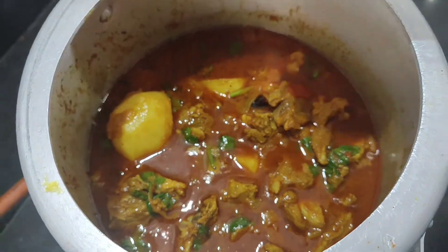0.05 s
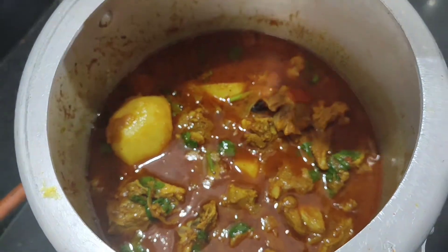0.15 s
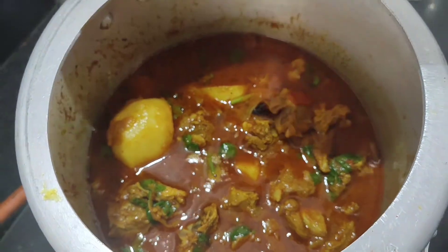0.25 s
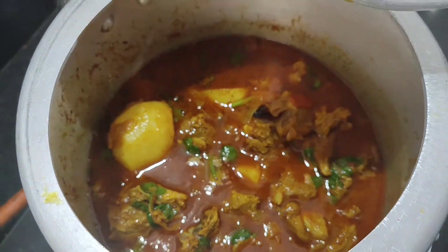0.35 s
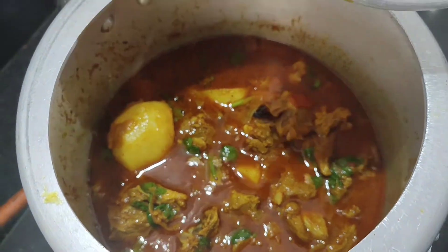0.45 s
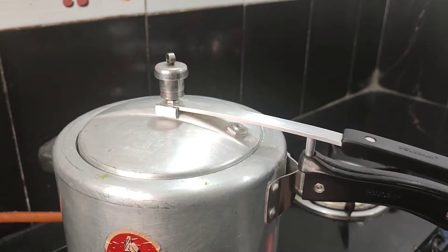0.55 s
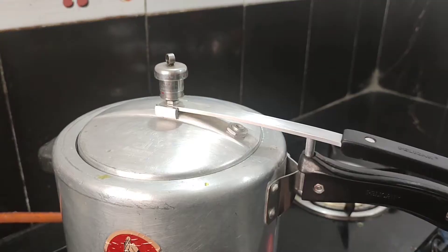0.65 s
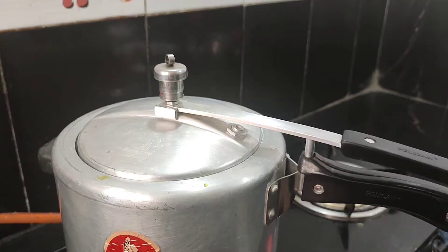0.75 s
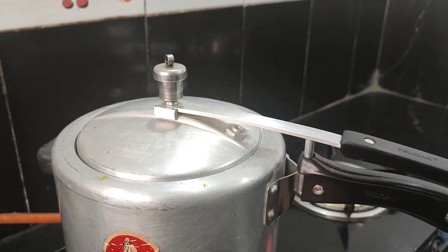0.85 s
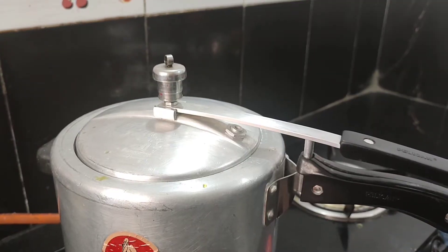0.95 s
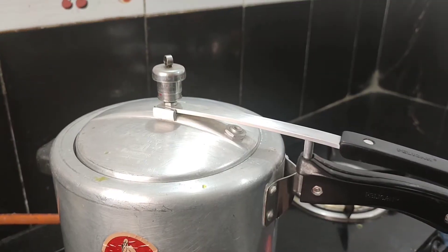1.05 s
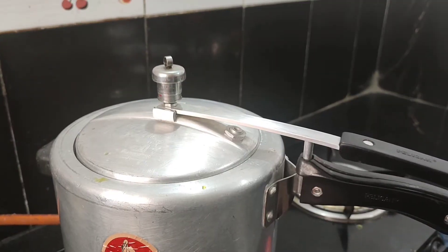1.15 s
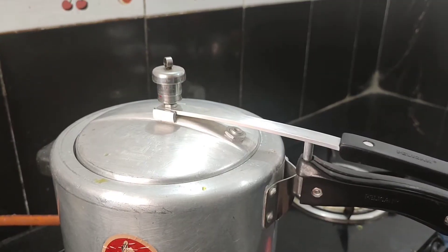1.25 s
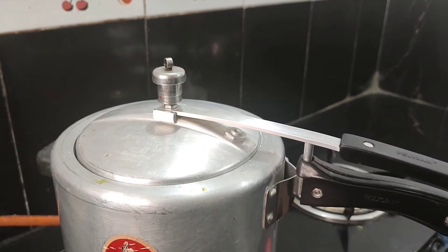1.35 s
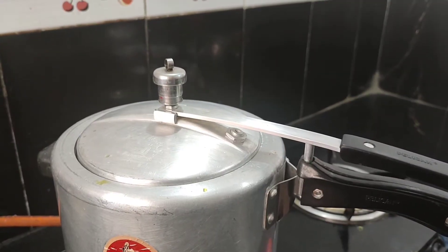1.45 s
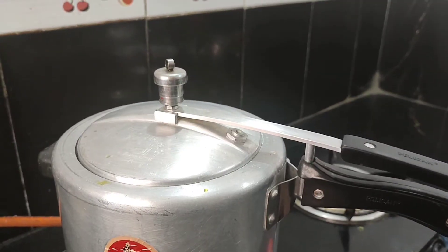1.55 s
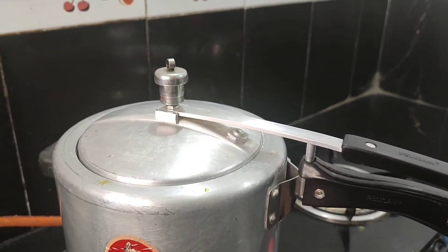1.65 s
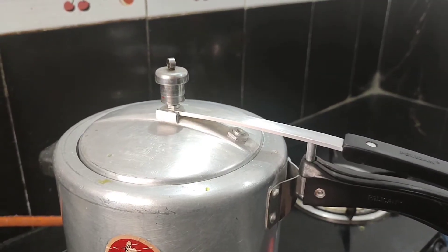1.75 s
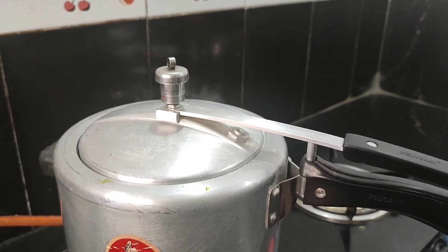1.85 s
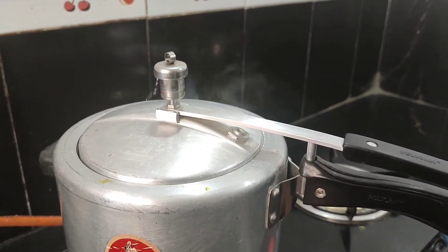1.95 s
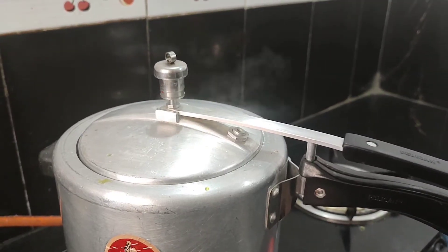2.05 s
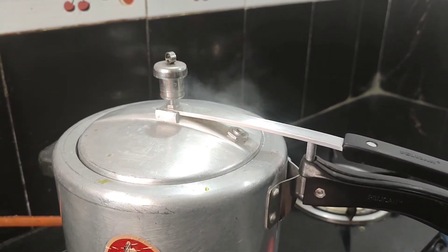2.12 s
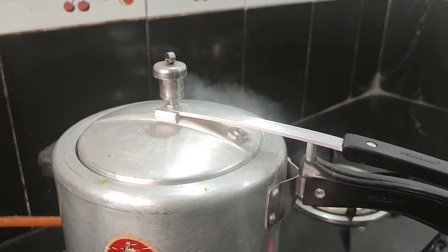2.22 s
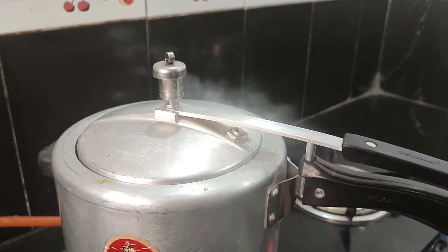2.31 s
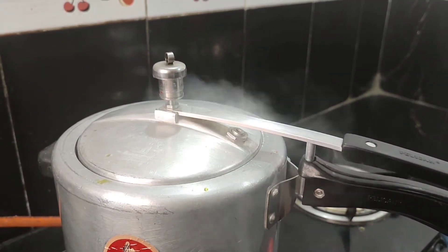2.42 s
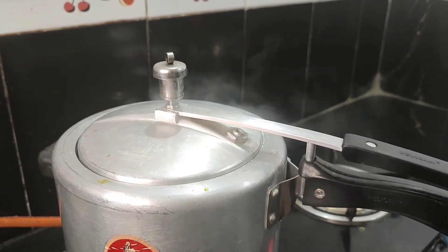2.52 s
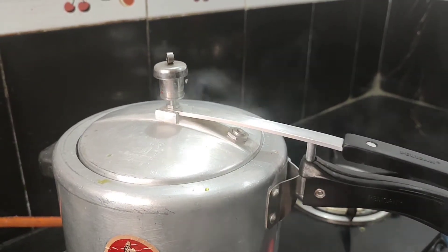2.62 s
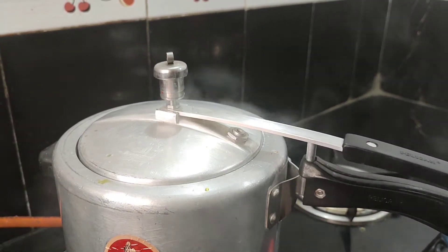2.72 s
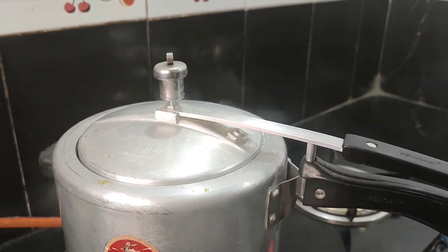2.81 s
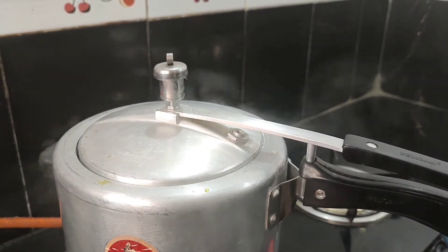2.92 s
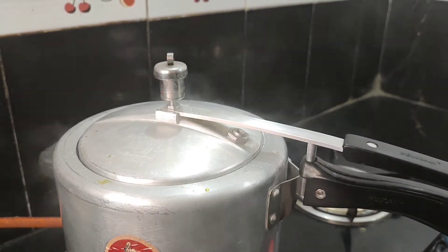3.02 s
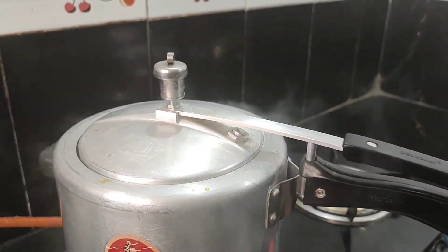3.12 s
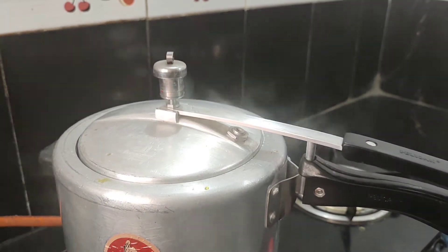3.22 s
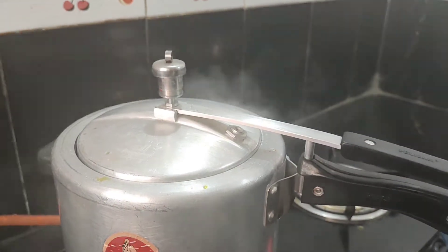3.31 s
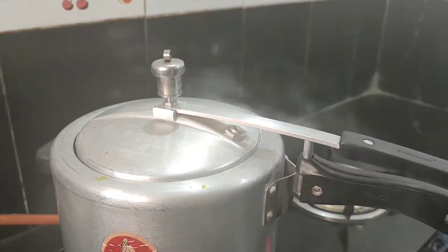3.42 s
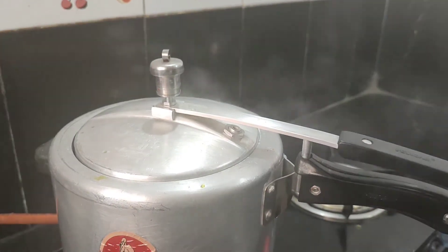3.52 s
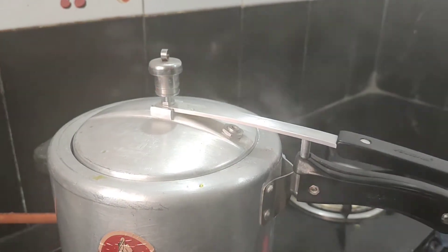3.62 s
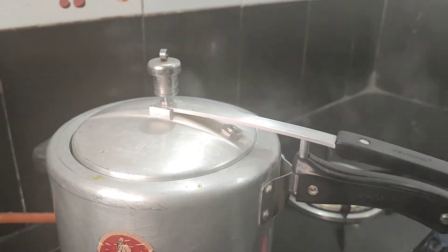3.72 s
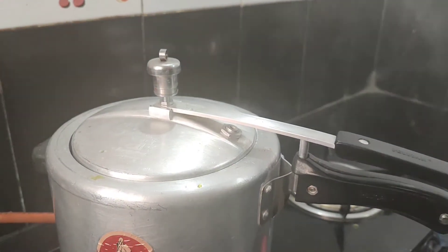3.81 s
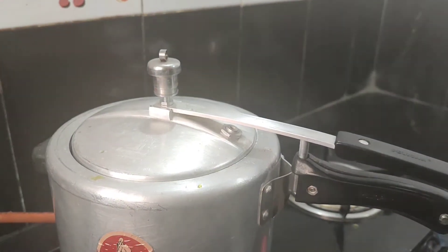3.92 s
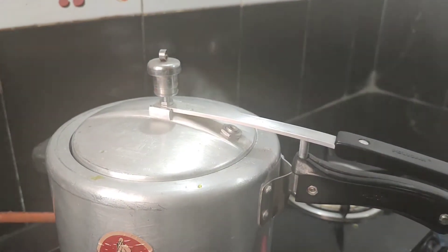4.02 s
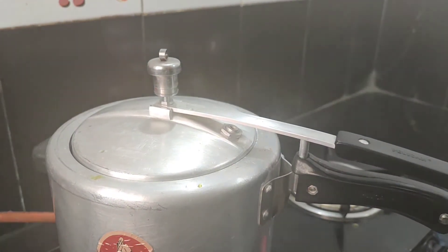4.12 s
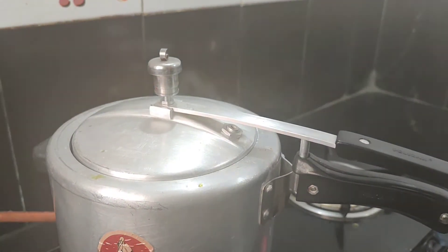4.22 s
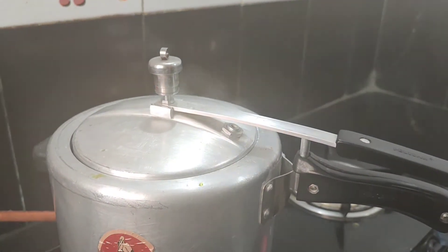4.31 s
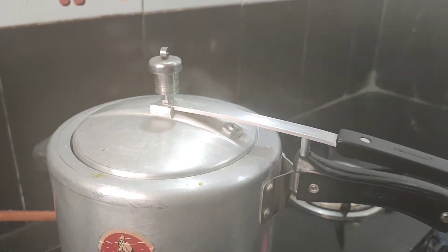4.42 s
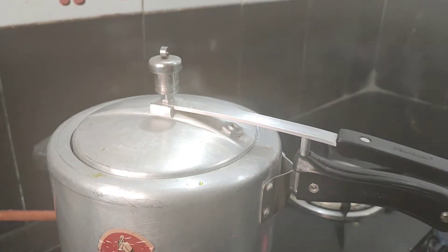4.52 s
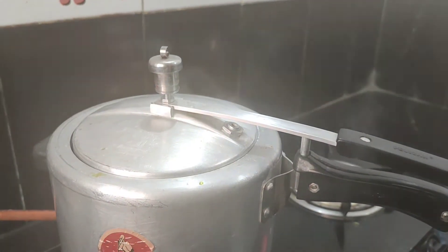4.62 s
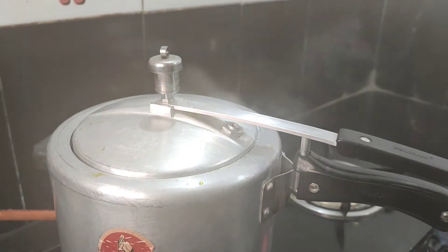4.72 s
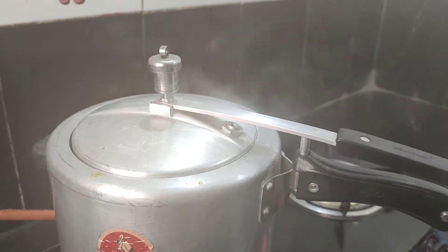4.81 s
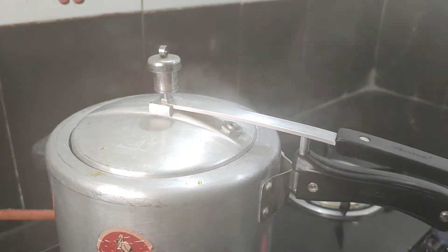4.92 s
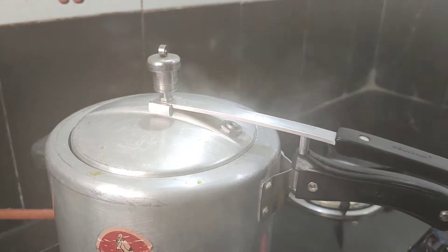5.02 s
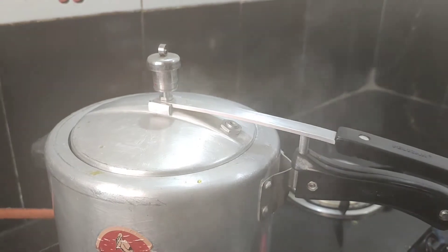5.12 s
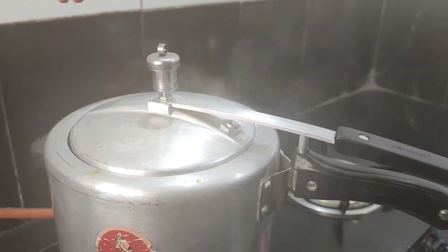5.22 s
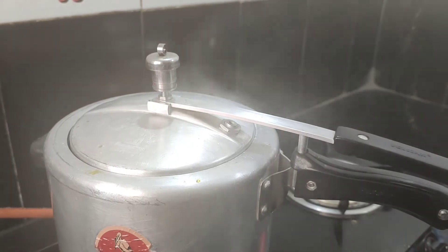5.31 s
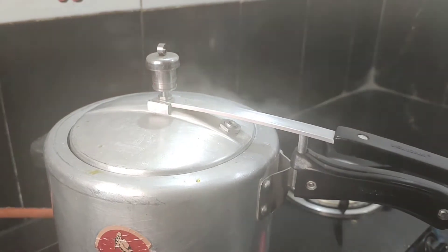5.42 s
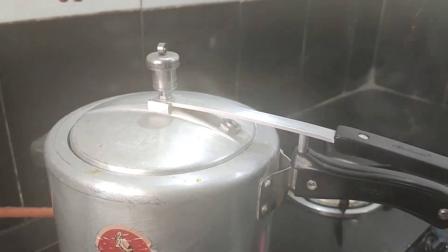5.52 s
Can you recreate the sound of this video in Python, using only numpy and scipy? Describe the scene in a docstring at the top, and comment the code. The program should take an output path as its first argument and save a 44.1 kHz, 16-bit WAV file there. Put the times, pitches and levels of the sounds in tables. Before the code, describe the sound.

Weak puffs of steam leak from a pressure cooker valve, build, then burst with a soft low thump into a constant bright, piercing hiss.

```python
"""A pressure cooker sputters steam under its weight valve, after a silent moment, close by in a tiled kitchen.
The weight lifts and the jet, coloured noise in flickering slices, roars steadily.
Its ultrasonic part bends both microphone membranes, which turns it into a low rustle.
A gas flame of low noise rumbles softly underneath, with a faint mains hum of steady tones."""
import sys
import numpy as np
from scipy import signal
from scipy.fft import rfft, irfft
from scipy.io import wavfile
from scipy.ndimage import uniform_filter1d, map_coordinates

SR = 44100
rng = np.random.default_rng(int(sys.argv[2]) if len(sys.argv) > 2 else 0)


def unload_wav(signal):
    """Save mono or channel-first audio to the path in sys.argv[1] as 16-bit WAV at rate SR, clipped to [-1, 1]."""
    wavfile.write(
        sys.argv[1],
        SR,
        np.round(np.clip(np.atleast_2d(signal).T, -1, 1) * 32767).astype(np.int16),
    )


N = 244755
T = np.arange(N) / SR
HZ = np.maximum(np.arange(N // 2 + 1) * SR / N, 1.)  # frequency of each bin
START_S, FADE_S = 0.5434, 0.019  # the sound fades in after the silence
LIFT_S, LIFT_RISE_S = 1.752, 0.13  # the weight leaves its seat and rises
BURST_S, BURST_RISE_S = 1.855, 0.07  # the weight clears the vent


def undb(db):
    """Decibels to gain."""
    return 10 ** (np.asarray(db) / 20)


def unit(x):
    """Scaled to rms 1 over all channels."""
    return x / np.sqrt(np.mean(x ** 2))


def colour(points):
    """dB at every bin, joined on a log frequency axis."""
    hz, db = np.transpose(points)
    return np.interp(np.log(HZ), np.log(hz), db)


def bell(hz, centre_hz, width_hz):
    """Resonance curve: 1 at the centre, half at the edges of its width."""
    return 1 / (1 + (2 * (hz - centre_hz) / width_hz) ** 2)


def noise(gain):
    """Noise with this gain at each bin."""
    return irfft(gain * rfft(rng.standard_normal(N)), N)


def walk(rate):
    """Random levels held 1 / rate s and slewed twice; spread near 1."""
    hold = max(int(SR / rate), 2)
    steps = np.repeat(rng.standard_normal(N // hold + 1), hold)
    return 2.76 * uniform_filter1d(uniform_filter1d(steps, hold), hold)[:N]


# Spectrum of the open jet: pitch_hz [Hz], level_db [relative dB per Hz]
JET_COLOUR = [(710, -32), (1300, -22.5), (2000, -13), (2600, -11), (3600, -6), (4400, -10), (5000, -6),
              (5700, -5), (6600, -3), (7500, 0), (8300, -2), (9280, -9), (10800, -9), (14000, -15.5)]
# Stereo lean of the jet: pitch_hz [Hz], left_minus_right_db [dB]
JET_BALANCE = [(1500, -1), (2500, -2.5), (4200, -1.5), (5600, 0), (6500, -1.5), (7800, 3.5), (9200, -2),
               (11000, -1.5), (14000, -1)]
# Phase of the part both microphones share: pitch_hz [Hz], left_lead [radians]
JET_PHASE = [(0, 0.5), (1890, 3.35), (2410, 5.36), (3360, 11.2), (4220, 9.1), (4910, 19.7), (6290, 19.8),
             (6890, 18), (7750, 12.4), (8610, 15.15), (12400, 19), (13300, 22.5), (13700, 24.4),
             (14700, 26.2)]
# Cavities of weight and lid rung by the jet: pitch_hz [Hz], width_hz [Hz], boost_db [dB, negative is a notch]
CAVITIES = [(2410, 260, 2), (2800, 90, -2), (3270, 60, 3), (3360, 130, -5), (3750, 200, 1), (4120, 60, -4),
            (4010, 50, 3), (4450, 70, 4), (4650, 80, 3.5), (4730, 60, -3), (5380, 60, 2.5), (5680, 60, 2.5),
            (5910, 60, 2.5), (6280, 50, 2.5), (6600, 60, 2.5), (6760, 40, 2.5), (7750, 200, 1)]
# Colour of the seated leak against the open jet: pitch_hz [Hz], level_db [dB]
SEATED_TILT = [(1200, 3.5), (2200, 0.5), (3200, 0.9), (5000, -4.5), (6400, 1.4), (8000, 0.9), (12000, 0.6)]


def jet(gust_db=.3, flicker_db=.6, alike=.22):
    """Turbulent hiss in overlapping slices that gust together and flicker alone."""
    up, puff_db = lifted(LIFT_S, LIFT_RISE_S), puffs()
    level_db = puff_db + release(seated_db=-38.5, db_per_s=6.5, from_s=LIFT_S, rise_s=LIFT_RISE_S,
                                 lifted_db=-17.5, surge_db=0.8, settle_s=0.18)
    # seated to lifted; body and treble stand against the core and lag each dB of puff
    lag_db = -0.076 * puff_db
    treble_db = np.interp(up, [0, 1], [-8, -5.5]) + lag_db
    body_db = np.interp(up, [0, 1], [-14, -12.5]) + lag_db
    pan_db = np.interp(up, [0, 1], [1.6, 0.4])  # left minus right

    shape_db = colour(JET_COLOUR) + np.array([[.5], [-.5]]) * colour(JET_BALANCE)
    for hz, width_hz, boost_db in CAVITIES:
        shape_db = shape_db + boost_db * bell(HZ, hz, width_hz)
    shared, *own = rfft(rng.standard_normal((3, N)))
    lead = np.exp(np.array([[.5j], [-.5j]]) * np.interp(HZ, *np.transpose(JET_PHASE)))
    spectra = undb(shape_db) * (np.sqrt(alike) * shared * lead + np.sqrt(1 - alike) * np.array(own))

    parts = {"body": 0, "core": 0, "treble": 0}
    gust = gust_db * walk(13)
    for hz in 800 * 2 ** (np.arange(14) / 3):  # third-octave steps
        slice_gain = np.cos(np.pi / 2 * np.clip(3 * np.log2(HZ / hz), -1, 1)) ** 2
        name = "body" if hz < 4500 else "core" if hz < 9000 else "treble"
        flicker = flicker_db * np.array([walk(40), walk(40)])
        tilt_db = (1 - up) * np.interp(hz, *np.transpose(SEATED_TILT))
        parts[name] = parts[name] + undb(gust + flicker + tilt_db) * irfft(slice_gain * spectra, N)
    hiss = unit(parts["core"])
    hiss = hiss + undb(body_db) * unit(parts["body"])
    hiss = hiss + undb(treble_db) * unit(parts["treble"])
    # unrelated channels each stand 3 dB above their mean
    return hiss * np.sqrt(2) * undb(level_db + np.array([pan_db, -pan_db]) / 2)


def lifted(from_s, rise_s):
    """0 while the weight sits, 1 once it is up."""
    return np.clip((T - from_s) / rise_s, 0, 1)


def release(seated_db, db_per_s, from_s, rise_s, lifted_db, surge_db, settle_s):
    """Level that creeps up with pressure, jumps as the weight lifts, overshoots and settles."""
    seated = seated_db + db_per_s * (T - START_S)
    since_up_s = np.maximum(T - from_s - rise_s, 0)
    opened = lifted_db + surge_db * np.exp(-(since_up_s / settle_s) ** 2)
    return seated + lifted(from_s, rise_s) * (opened - seated)


# Puffs as the weight rocks on its seat: peak_s [s], strength_db [dB], swell_s [s]
PUFFS = [(.835, 4.5, 0.067), (1.1, 3, 0.079), (1.2, 1.5, 0.12), (1.58, 4.5, 0.17), (1.74, 3, 0.021)]


def puffs(stop_s=0.027):
    """dB added by the puffs, each a swell and then a stop over stop_s."""
    total_db = 0
    for peak_s, strength_db, swell_s in PUFFS:
        span_s = np.where(T < peak_s, swell_s, stop_s)
        total_db = total_db + strength_db * np.exp(-((T - peak_s) / span_s) ** 2)
    return total_db


def ultrasound(left_db=-0.8, right_db=1.1, sway_db=1.0):
    """The jet above hearing, gathered by each microphone's port resonance."""
    gain = (HZ > 15500) * bell(HZ, centre_hz=18880, width_hz=1930)
    level_db = release(seated_db=-26, db_per_s=4.2, from_s=BURST_S, rise_s=BURST_RISE_S,
                       lifted_db=-10.5, surge_db=1.7, settle_s=0.76)
    return np.array([unit(noise(gain)) * undb(level_db + side_db + sway_db * walk(60))
                     for side_db in (left_db, right_db)])


def buffet(top_hz=45, gust_db=1.5):
    """Slow gusts of low noise, unrelated at the two microphone ports."""
    gain = 1 / (1 + (HZ / top_hz) ** 2) * (HZ > 12)
    level_db = release(seated_db=-64, db_per_s=0.025, from_s=BURST_S, rise_s=BURST_RISE_S,
                       lifted_db=-45.5, surge_db=5.5, settle_s=0.083)
    return np.array([unit(noise(gain)) * undb(level_db + gust_db * walk(15)) for _ in range(2)])


# Jump of the weight, strengths ahead of the envelope:
# start_s [s], pull_db [dB], attack_s [s], release_s [s], wobble_hz [Hz], wobble_db [dB]
THUMP = [(1.85, -16, 0.034, 0.15, 35, -31)]


def weight():
    """A low pull of air with a brief wobble as the weight jumps off its seat."""
    out = np.zeros(N)
    for start_s, pull_db, attack_s, release_s, wobble_hz, wobble_db in THUMP:
        t = np.maximum(T - start_s, 0)
        pull = undb(pull_db) + undb(wobble_db) * np.sin(2 * np.pi * wobble_hz * t)
        out -= pull * (1 - np.exp(-(t / attack_s) ** 4)) * np.exp(-t / release_s)
    return out


# Spectrum of the burner rumble: pitch_hz [Hz], level_db [relative dB per Hz]
FLAME = [(8, 2), (30, -5.5), (60, -9), (143, -20), (300, -17), (600, -23.5), (1500, -22), (2200, -28.5)]
# Hum resonances excited by the flame: pitch_hz [Hz], width_hz [Hz], boost_db [dB]
HUM = [(117, 20, 9.5), (172.6, 6.6, 12), (251.7, 7.3, 11.5), (395, 18, 6)]


def flame(level_db=-47.5, alike=0.63, flutter_db=.7):
    """Low burner rumble with a narrow hum, mostly alike at both microphones."""
    gain = undb(colour(FLAME) + sum(boost_db * bell(HZ, hz, width_hz) for hz, width_hz, boost_db in HUM))
    both = np.sqrt(alike) * noise(gain)
    pair = np.array([both + np.sqrt(1 - alike) * noise(gain) for _ in range(2)])
    return unit(pair) * undb(level_db + flutter_db * walk(26.83))


# Steady hum of a kitchen appliance, ahead of the microphones: pitch_hz [Hz], level_db [dB rms]
MAINS = [(100.0, -57), (200.0, -67.5), (500.0, -71)]


def mains():
    """Steady sine tones, the same at both microphones."""
    return sum(np.sqrt(2) * undb(level_db) * np.sin(2 * np.pi * (hz * T + rng.random()))
               for hz, level_db in MAINS)


def tiles(x, tail_db=-13, t60_s=0.077):
    """Hard tiles return a dense short tail of decaying noise, different at each microphone."""
    t = np.arange(SR // 4) / SR
    tail = rng.standard_normal((2, len(t))) * undb(-60 * t / t60_s) * (t > .002)
    tail = undb(tail_db) * tail / np.sqrt(np.sum(tail ** 2, axis=1, keepdims=True))
    wet = signal.fftconvolve(x, tail, axes=1)[:, :N]
    return (x + wet) / np.sqrt(1 + undb(2 * tail_db))  # keeps the power


# Pitches around which the coding dips gather: pitch_hz [Hz]
DIP_HZ = (1950, 2800, 3050, 3350, 3650, 3900, 4200, 4720)


def coding_dips(x, low_hz=1750, high_hz=4850, width_hz=55, span_s=0.045, dip_db=55, size=2048):
    """Brief narrow dips between low_hz and high_hz, as lossy audio coding leaves, same in both channels."""
    hz, t, z = signal.stft(x, SR, nperseg=size, noverlap=3 * size // 4)
    # a smooth random field over pitch and time; dip_db is the depth per unit above its threshold
    grid = np.meshgrid(hz / width_hz, t / span_s, indexing="ij")
    field = unit(map_coordinates(rng.standard_normal((600, 600)), grid, order=1, mode="mirror"))
    gather = sum(.55 * bell(hz, centre_hz, width_hz=200) for centre_hz in DIP_HZ)[:, None]
    gain = undb(-dip_db * np.clip(field + gather - .5, 0, 1))
    gain = gain / np.sqrt(np.mean(gain ** 2, axis=1, keepdims=True))  # mean power gain of 1 per bin
    inside = 1 / (1 + (low_hz / (hz + 1)) ** 30) / (1 + (hz / high_hz) ** 40)
    return signal.istft(z * gain ** inside[:, None], SR, nperseg=size, noverlap=3 * size // 4)[1][:, :N]


def scene():
    """Jet in the tiled corner, its ultrasound and gusts, the jump of the weight, the flame and the hum."""
    return tiles(jet()) + ultrasound() + buffet() + weight() + flame() + mains()


def record(dry, bend=0.18, gain_db=.5, bass_hz=1.8, top_hz=14250):
    """Uneven membranes add difference tones by squaring; narrow coding dips, bass and top are cut."""
    bent = dry + bend * dry ** 2
    bent = signal.sosfilt(signal.butter(2, bass_hz, "high", fs=SR, output="sos"), bent)
    clipped = np.clip(undb(gain_db) * bent, -1, 1)
    opened = coding_dips(clipped) * np.clip((T - START_S) / FADE_S, 0, 1)  # silent before START_S
    return signal.sosfilt(signal.ellip(18, .3, 95, top_hz, fs=SR, output="sos"), opened)


dry = scene()
out = record(dry)
unload_wav(out)
```